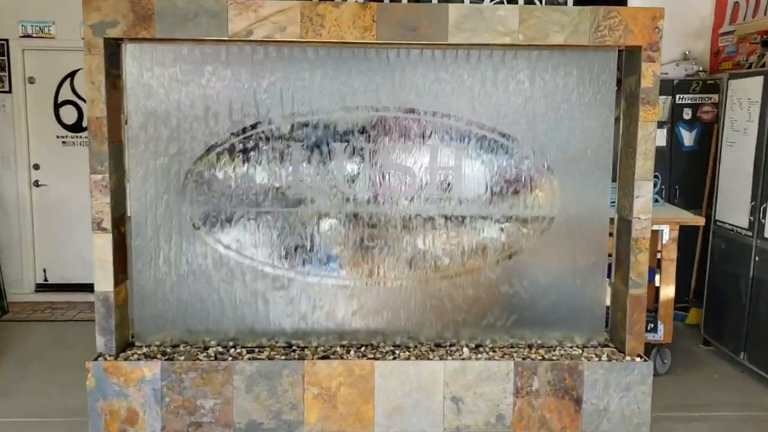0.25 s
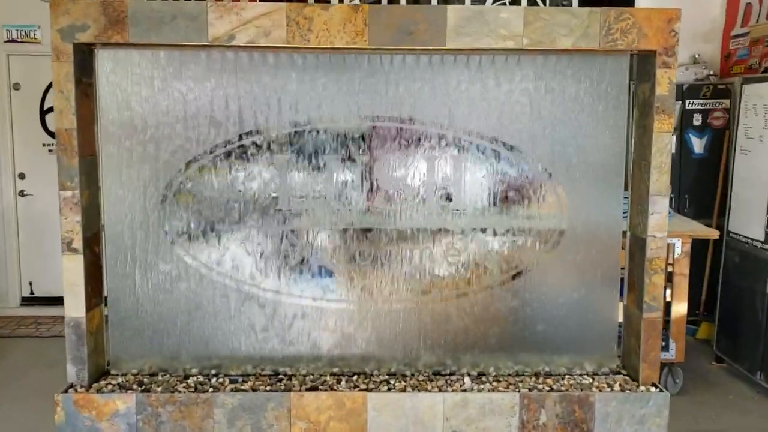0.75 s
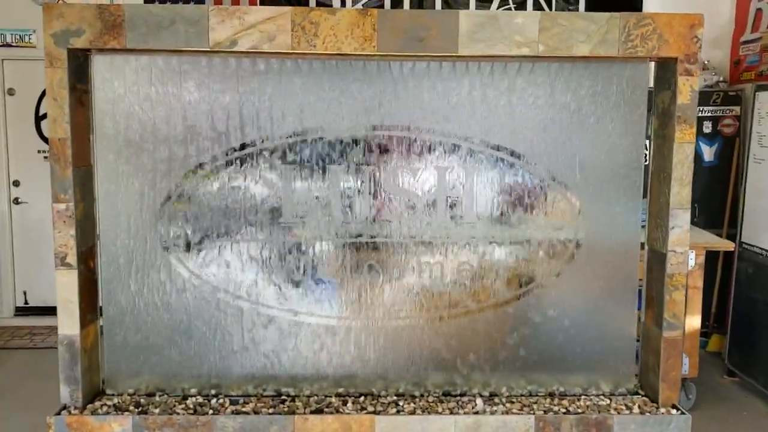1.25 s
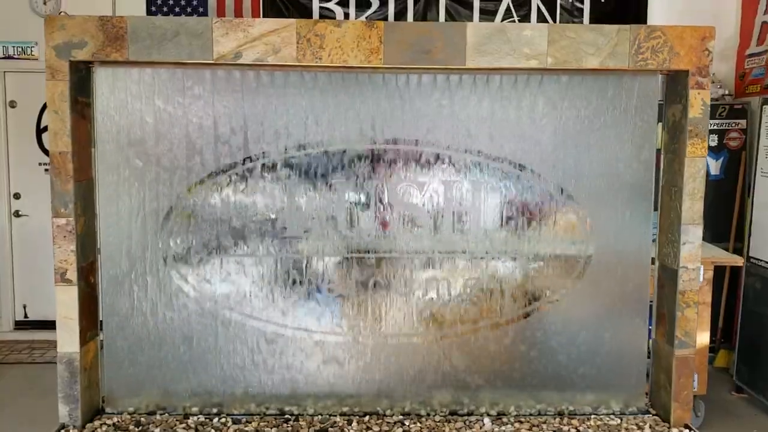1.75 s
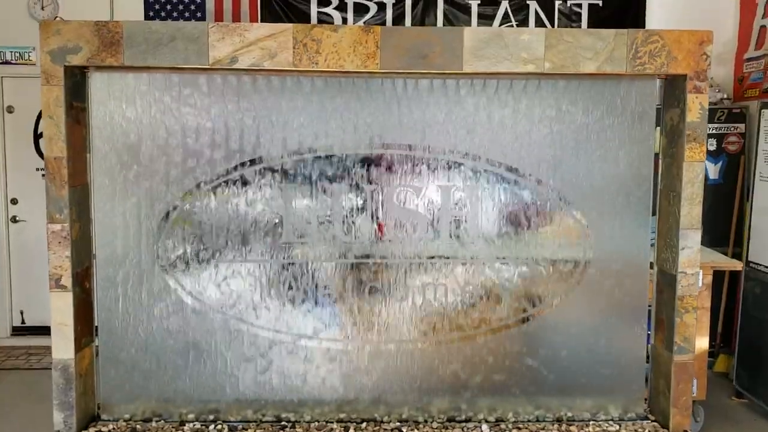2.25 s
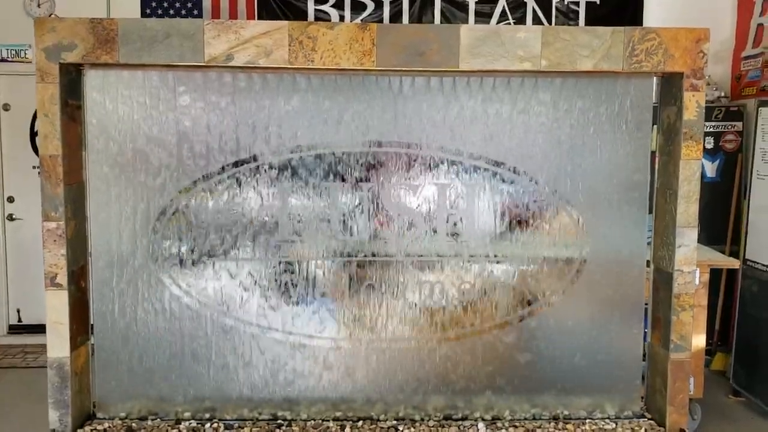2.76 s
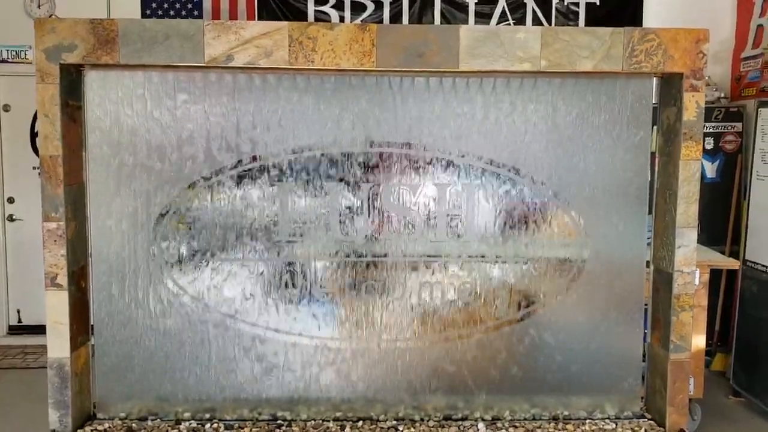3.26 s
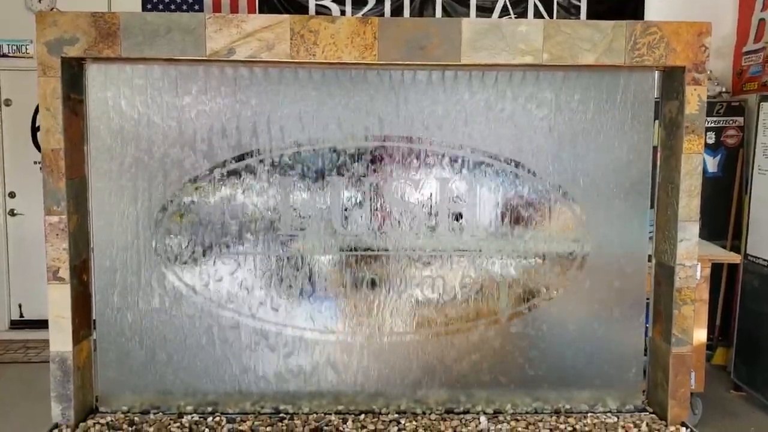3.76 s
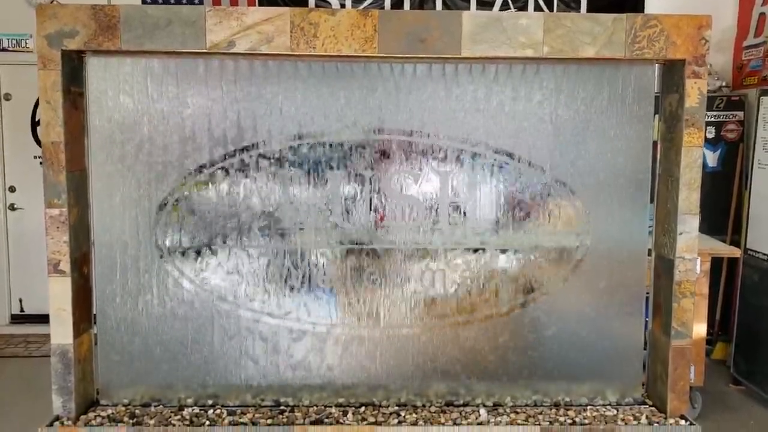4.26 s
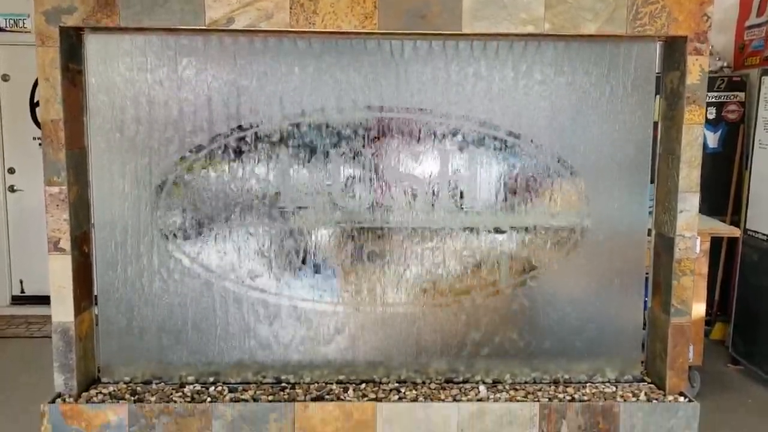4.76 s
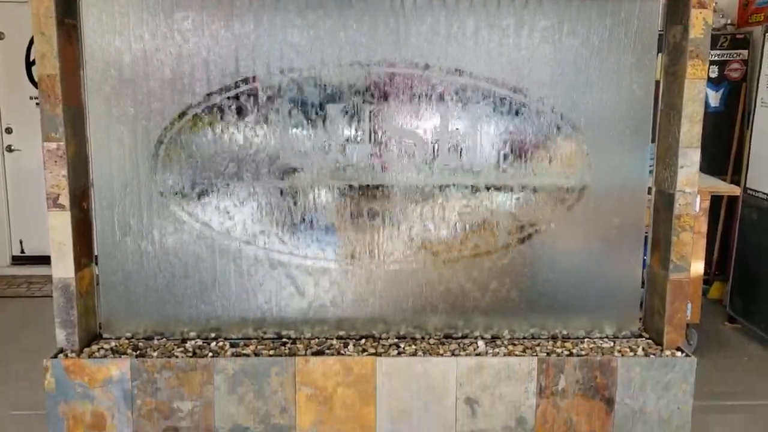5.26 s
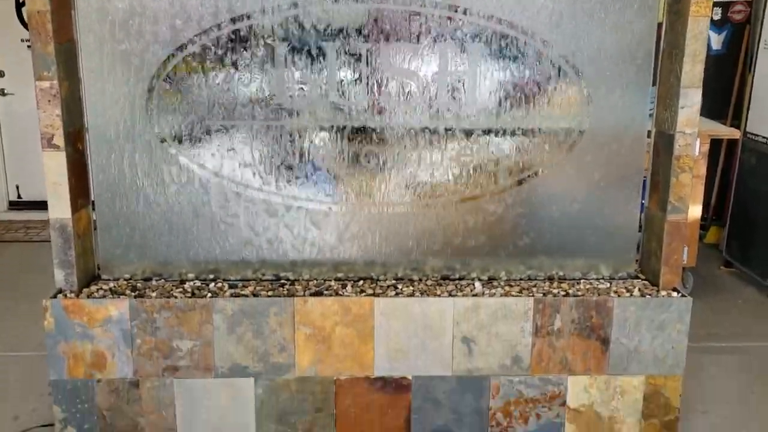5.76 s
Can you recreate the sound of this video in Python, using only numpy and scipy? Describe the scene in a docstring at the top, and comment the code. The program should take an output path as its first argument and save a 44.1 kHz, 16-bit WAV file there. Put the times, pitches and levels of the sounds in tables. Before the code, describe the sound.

For about six seconds, water slides down a panel and drops onto pebbles in a basin. A fine, bright, flickering hiss and a softer, patchy trickle run throughout, over a quiet low pump hum near 108 Hz and room rumble. From 0.15 to 0.45 seconds bubbly splashes and clicks crowd together, with one very brief tap on the recorder at 0.2, stronger on the right. More splashing comes around 0.7 and 0.9. Dull, soft footfalls land at about 1.0, 1.3, 1.4 and 1.7. Then scattered round plops, drips and tiny hard stone clicks continue irregularly, with a clearer splash near 3.2 and quieter bubbling around 4.5. At 5.4 to 5.5 sharp clicks and splashes flare up, then ease. The hard workshop gives each splash a short ring; bass is central, treble wide and uneven between sides.

```python
"""A water wall in a workshop: a film of water slides down a glass panel and drops onto pebbles in a basin.
All through, pump and mains hum under a trickle and a fine spray, both shaped noise, with small chance drips.
Splashes (clumps of ringing bubbles) crowd the start; at 0.2 s a tap on the hand-held recorder makes one pulse.
Dull footfalls, low roughened tones, come from 1.0 to 1.7 s; splashes and stone clicks liven up near 5.4 s.
The hard room rings after every splash, as fading noise, and two unlike microphone ports take in the sound."""
import sys
import numpy as np
from scipy import signal
from scipy.fft import rfft, irfft, next_fast_len
from scipy.io import wavfile
from scipy.ndimage import uniform_filter1d, map_coordinates

SR = 44100
rng = np.random.default_rng(int(sys.argv[2]) if len(sys.argv) > 2 else 0)


def to_wav(sig):
    """Store sig (one row per channel, or 1-D mono) as 16-bit WAV at the path in sys.argv[1].

    Samples outside -1..1 are clipped; the rate is SR.
    """
    pcm = np.clip(np.atleast_2d(sig), -1, 1) * 32767
    pcm = np.round(pcm).astype(np.int16)
    wavfile.write(sys.argv[1], SR, pcm.T)  # frames by channels


N = 266011  # length in samples, about 6 s
TOP_HZ = 15870  # nothing sounds above this


def amp(db):
    """Turns decibels into a plain multiplier."""
    return 10 ** (np.asarray(db) / 20)


def unit(x):
    """Scales a sound to an rms (average strength) of 1."""
    return x / np.sqrt(np.mean(x ** 2) + 1e-20)


def along(points, hz):
    """Reads a curve of (f/Hz, value) points, with frequency on a log axis."""
    f, v = np.transpose(points)
    return np.interp(np.log(hz + 1), np.log(f + 1), v)


def over_time(points):
    """Reads a curve of (t/s, value) points at every sample."""
    return np.interp(np.arange(N) / SR, *np.transpose(points))


def wobble(rate):
    """A smooth random curve through this many random points a second."""
    knots = rng.standard_normal(int(N * rate / SR) + 4)
    return map_coordinates(knots, [np.arange(N) * rate / SR])


def filtered(x, response):
    """Makes each frequency of x louder or softer, as the response says."""
    m = next_fast_len(N + SR // 2)
    return irfft(rfft(x, m) * response(np.fft.rfftfreq(m, 1 / SR)), m)[..., :N]


def patchy(spectrum, patchy_db, flicker_db):
    """Two unrelated noises, rms 1 together, sharing louder and softer patches and a fast flicker."""
    z = signal.stft(rng.standard_normal((2, N)), nperseg=512)[2]
    field = uniform_filter1d(rng.standard_normal(z.shape[1:]), size=8, axis=0)  # smooth over frequency
    field = uniform_filter1d(field, size=10, axis=1)  # smooth over time
    pair = signal.istft(z * amp(patchy_db * unit(field)), nperseg=512)[1][:, :N]
    flickering = pair * amp(flicker_db * wobble(300))
    return unit(filtered(flickering, lambda hz: amp(along(spectrum, hz))))


# Steady tones of pump and mains: f/Hz, level/dB (rms), waver/dB
PUMP_TONES = [(59.5, -73, 2), (108.2, -50, 0.6), (116.1, -66, 2), (120, -69, 3), (216.5, -67.5, 1),
              (349, -75, 1.5)]
# Colour of the room's rumble: f/Hz, relative level/dB per Hz
RUMBLE_COLOUR = [(12, -21), (25, 0.5), (45, -9), (75, 2.5), (140, -0.5), (190, 2), (300, -3.5), (370, -6),
                 (470, -18), (700, -15), (1000, -74)]


def pump():
    """Pump and mains give steady, slightly wavering tones over the rumble of the room."""
    t = np.arange(N) / SR
    tones = np.zeros(N)
    for hz, db, waver_db in PUMP_TONES:
        level = amp(db + waver_db * wobble(4))
        tones += level * np.sin(2 * np.pi * (hz * t + rng.random()))
    rumble = amp(-63) * patchy(RUMBLE_COLOUR, patchy_db=1, flicker_db=1.0)
    return np.sqrt(2) * tones * [[1], [0]] + rumble  # the tones take the first path only


# Loudness of the spray before its swell: t/s, level/dB
SPRAY_LOUDNESS = [(0.0, -56), (0.23, -57.5), (0.45, -60), (0.6, -55.5), (0.78, -50), (0.98, -56.5),
                  (1.08, -52.5), (1.26, -50), (1.38, -53.5), (1.75, -55), (1.88, -54), (2.1, -53.5),
                  (2.42, -56), (2.7, -52), (2.88, -50.5), (3.01, -57.5), (3.12, -50.5), (3.35, -52),
                  (3.6, -57), (3.8, -53.5), (4.02, -56), (4.22, -53.5), (4.4, -55), (4.6, -51.5),
                  (4.8, -54.5), (5.04, -56.5), (5.2, -53), (5.42, -50.5), (5.52, -53.5), (5.6, -56),
                  (5.69, -52.5), (6.03, -54)]
# Colour of the spray: f/Hz, relative level/dB per Hz
SPRAY_COLOUR = [(1760, -53), (3000, -62), (3260, -66), (3830, -10), (4980, -3.5), (7100, 8.5), (7940, 3),
                (12500, 4.5), (13500, 5), (14600, 12.5), (15700, 5.5)]


def spray(swell):
    """Fine spray is a bright hiss: countless tiny drops blur into flickering noise."""
    level = amp(over_time(SPRAY_LOUDNESS) + 2.52 * swell)  # swell in dB
    return level * patchy(SPRAY_COLOUR, patchy_db=1.2, flicker_db=0.9)


# Loudness of the trickle before its swell: t/s, level/dB
TRICKLE_LOUDNESS = [(0.0, -58), (0.2, -57.5), (0.34, -49), (0.5, -59), (0.86, -63), (1.0, -62), (1.15, -61),
                    (1.3, -53.5), (1.47, -64), (1.71, -58), (1.88, -65), (2.48, -66.5), (2.82, -56),
                    (3.0, -60.5), (3.31, -61), (3.47, -60), (3.55, -62.5), (3.65, -66.5), (3.82, -64),
                    (3.97, -67), (4.2, -64), (4.42, -66), (4.62, -66.5), (4.85, -65), (5.12, -59),
                    (5.24, -65), (5.36, -60), (5.5, -60.5), (5.61, -58.5), (6.03, -65)]
# Colour of the trickle: f/Hz, relative level/dB per Hz
TRICKLE_COLOUR = [(260, -26), (450, -4), (963, -4), (1460, 3), (2040, -6), (2860, -3), (3270, -8),
                  (3820, 0.5), (4500, -2.5), (5850, -4.5), (9900, -120)]


def trickle(swell):
    """Water trickling between the pebbles is a patchy noise, lower than the spray."""
    level = amp(over_time(TRICKLE_LOUDNESS) + 2 * swell)  # swell in dB
    return level * patchy(TRICKLE_COLOUR, patchy_db=3, flicker_db=0.0)


def water_film():
    """The steady water: trickle and spray swell together."""
    swell = wobble(8)
    return trickle(swell) + spray(swell)


def knock():
    """A finger taps the housing by the right port: a dip and a rebound, stronger on the right."""
    u = (np.arange(N) / SR - 0.203) / 0.00063  # time from the middle of the tap, in steps of 0.63 ms
    return amp([[-44], [-24]]) * u * np.exp(-abs(u) ** 0.96)


# Dull footfalls on the floor: t/s, level/dB, f/Hz
FOOTFALLS = [(1.032, -49, 336), (1.301, -53, 366), (1.38, -52.5, 382), (1.7, -57, 340)]
FOOTFALL_T60_S, FOOTFALL_RISE_S = 0.3, 0.012  # time to fall by 60 dB; time scale of the soft start
FOOTFALL_ROUGH = 0.8  # depth of the random roughness


def footfalls():
    """Low, roughened, soft-starting thuds, sent down the first path, which both ports share."""
    out, t = np.zeros((2, N + SR)), np.arange(SR // 2) / SR
    for s, db, hz in FOOTFALLS:
        rough = uniform_filter1d(rng.standard_normal(len(t)), size=400)
        ring = np.sin(2 * np.pi * hz * t) * (1 + FOOTFALL_ROUGH * unit(rough))
        envelope = amp(db - 60 * t / FOOTFALL_T60_S) * (1 - np.exp(-t / FOOTFALL_RISE_S))
        out[0, round(s * SR):][:len(t)] += envelope * ring
    return out[:, :N]


# Drops striking pebbles: t/s, click level/dB, f/Hz, level/dB of the droplets thrown up
PEBBLE_DROPS = [(0.2019, -42, 14600, -52), (0.3016, -56, 6900, -56.5), (0.416, -38, 5550, -51.5),
                (0.8675, -52, 7500, -63), (0.899, -41.5, 7000, -67), (1.045, -65, 8500, -57),
                (1.62, -54, 14200, -61.5), (1.8, -56, 15400, -60), (1.958, -53, 15500, -62),
                (2.142, -56, 14400, -66), (2.2159, -43, 8700, -60.5), (2.5893, -43, 11000, -59),
                (2.651, -44, 15200, -62), (2.811, -64, 10400, -61.5), (2.837, -40, 13600, -59.5),
                (2.9156, -43, 14600, -55), (3.041, -63, 8700, -60), (3.521, -52, 13500, -58),
                (3.692, -43, 14900, -66), (3.8367, -47, 8700, -55.5), (3.971, -41, 14400, -57.5),
                (4.3165, -42, 14400, -62), (4.3306, -54, 14800, -79), (4.349, -41, 14900, -77),
                (4.563, -53, 13900, -63), (4.744, -42, 7400, -62.5), (5.123, -48, 8500, -60),
                (5.4256, -38, 5700, -67), (5.4357, -32.5, 7170, -77), (5.474, -37, 14300, -62),
                (5.6166, -42, 14200, -62), (5.712, -46, 10200, -62)]
TICK_T60_S, TICK_RISE_S = 0.014, 0.0002  # time to fall by 60 dB; time scale of the start
TICK_NOISY = 0.55  # strength of the noisy crack, which mostly colours the highest clicks
BOUNCE_S, BOUNCE_DB = 0.0125, -9  # delay and level of the echo off the floor


def ticks():
    """A drop on stone gives a very short ringing click, then an echo off the floor by the second path."""
    out, t = np.zeros((2, N + SR)), np.arange(SR // 100) / SR
    for s, db, hz, _ in PEBBLE_DROPS:
        crack = np.diff(rng.standard_normal(len(t) + 2), 2)
        ring = np.sin(2 * np.pi * min(hz, TOP_HZ) * t) + TICK_NOISY * (hz / TOP_HZ) ** 3 * crack
        envelope = amp(db - 60 * t / TICK_T60_S) * (1 - np.exp(-t / TICK_RISE_S))
        out[0, round(s * SR):][:len(t)] += envelope * ring
    delay = round(BOUNCE_S * SR)
    out[1, delay:] = amp(BOUNCE_DB) * out[0, :-delay]
    return out[:, :N]


def spatter():
    """Rows like the splashes: droplets thrown up by each click, spread by half an octave."""
    return [(s, db, hz, 0.5, 0.012) for s, _, hz, db in PEBBLE_DROPS]


def drips(count):
    """Rows like the splashes: small drips of scattered pitch at chance moments."""
    when = rng.random(count) * N / SR
    level_db = -76 + 1.5 * rng.standard_normal(count)
    pitch_hz = 2600 * 2 ** (0.7 * rng.standard_normal(count))  # scattered by 0.7 octaves
    return [(s, db, hz, 0.06, 0.012) for s, db, hz in zip(when, level_db, pitch_hz)]


# How long the room rings at each pitch: f/Hz, time to fall by 60 dB/s
ROOM_RING = [(300, 0.79), (2000, 0.28), (6000, 0.19), (15000, 0.2)]


def echoed(burst, hz, near_db):
    """Hard walls scatter a burst into fading noise, different along two paths, after the straight sound."""
    t = np.arange(SR * 2 // 5) / SR
    fade = amp(-60 * t / along(ROOM_RING, hz)) * (1 - np.exp(-t / 0.006))  # the scatter builds up in some 6 ms
    tail = rng.standard_normal((2, len(t))) * fade
    tail /= np.linalg.norm(tail, axis=1, keepdims=True)
    tail[0, 0] = amp(near_db)  # the straight sound
    even_burst = burst[None] / np.linalg.norm(burst)
    return signal.fftconvolve(even_burst, tail, axes=1) * np.sqrt(0.075 * SR)  # energy like rms 1 for 75 ms


# Splashes at set times, loud and faint: t/s, level/dB, bubble f/Hz, pitch spread/octaves,
# half the time over which bubbles start/s
TIMED_SPLASHES = [(0.155, -51.5, 2450, 0.46, 0.048), (0.198, -57, 1050, 0.45, 0.014),
                  (0.2143, -49.5, 2840, 0.29, 0.0044), (0.2156, -56, 6700, 0.22, 0.014),
                  (0.242, -65, 5500, 0.47, 0.0049), (0.222, -52, 2950, 0.36, 0.0032),
                  (0.23, -50.5, 2640, 0.33, 0.0029), (0.237, -60, 2720, 0.46, 0.0028),
                  (0.2417, -53.5, 2400, 0.34, 0.0015), (0.248, -65, 2930, 0.22, 0.004),
                  (0.2978, -54, 1560, 0.45, 0.0021), (0.303, -46.5, 5130, 0.5, 0.05),
                  (0.308, -48, 13000, 0.54, 0.045), (0.386, -65, 1060, 0.1, 0.00463),
                  (0.413, -59.5, 1550, 0.13, 0.008), (0.64, -53.5, 3400, 0.36, 0.036),
                  (0.704, -58.5, 1457, 0.11, 0.022), (0.704, -54.5, 4000, 0.48, 0.008),
                  (0.722, -71, 2010, 0.26, 0.002), (0.7258, -55, 4260, 0.33, 0.0025),
                  (0.73, -61, 1466, 0.12, 0.031), (1.06, -63.5, 690, 0.19, 0.01),
                  (0.883, -65, 906, 0.16, 0.026), (0.889, -60.5, 2430, 0.67, 0.022),
                  (1.018, -55, 790, 0.68, 0.026), (1.037, -55.5, 2460, 0.31, 0.03),
                  (1.216, -65.5, 1530, 0.25, 0.021), (1.287, -60.5, 1556, 0.28, 0.019),
                  (1.346, -63.5, 2410, 0.052, 0.022), (1.359, -60.5, 1750, 0.093, 0.018),
                  (1.362, -59.5, 1320, 0.13, 0.028), (1.507, -62.5, 1910, 0.16, 0.015),
                  (1.626, -63.5, 1375, 0.065, 0.014), (1.631, -56.5, 2450, 0.83, 0.03),
                  (1.665, -68, 820, 0.18, 0.0043), (1.798, -67, 1304, 0.079, 0.01),
                  (1.8, -58.5, 3500, 0.19, 0.03), (1.828, -67, 1006, 0.15, 0.032),
                  (2.066, -64, 5240, 0.19, 0.0054), (2.114, -66, 1110, 0.34, 0.035),
                  (2.148, -63, 3300, 0.46, 0.016), (2.369, -64.5, 2000, 0.31, 0.014),
                  (2.402, -66, 1230, 0.23, 0.018), (2.455, -72, 3900, 0.023, 0.0037),
                  (2.572, -64.5, 1190, 0.36, 0.017), (2.609, -67, 780, 0.23, 0.0091),
                  (2.622, -66, 1340, 0.041, 0.0048), (2.654, -64, 3920, 0.061, 0.0086),
                  (2.719, -63, 2800, 0.076, 0.01), (2.734, -66, 893, 0.053, 0.0044),
                  (2.739, -62, 1375, 0.07, 0.017), (2.755, -64.5, 1720, 0.037, 0.035),
                  (2.816, -64.5, 4200, 0.084, 0.0047), (2.919, -63, 920, 0.49, 0.029),
                  (2.92, -60, 2270, 0.058, 0.0032), (2.933, -70, 2210, 0.034, 0.04),
                  (3.044, -63, 2300, 0.27, 0.0085), (3.046, -63, 1390, 0.1, 0.026),
                  (3.229, -69, 3940, 0.087, 0.0027), (3.163, -62, 3640, 0.2, 0.029),
                  (3.179, -67.5, 1070, 0.41, 0.0078), (3.228, -55, 1810, 0.23, 0.02),
                  (3.435, -72.5, 2720, 0.045, 0.039), (3.458, -70, 1430, 0.052, 0.0042),
                  (3.553, -66, 1696, 0.052, 0.0035), (3.705, -66.5, 5970, 0.079, 0.008),
                  (3.71, -63.5, 1786, 0.025, 0.018), (3.768, -62.5, 1510, 0.059, 0.027),
                  (3.839, -65.5, 1757, 0.063, 0.01), (4.044, -65, 1512, 0.056, 0.013),
                  (4.099, -70, 1240, 0.059, 0.011), (4.213, -70, 3600, 0.025, 0.04),
                  (4.267, -62.5, 2330, 0.03, 0.0035), (4.268, -59, 1290, 0.26, 0.018),
                  (4.479, -78, 1440, 0.056, 0.0097), (4.529, -77, 1490, 0.052, 0.0092),
                  (4.644, -74.5, 1540, 0.089, 0.019), (4.55, -75, 776, 0.11, 0.0072),
                  (4.567, -68, 3750, 0.053, 0.0034), (4.747, -74, 2100, 0.05, 0.01),
                  (4.772, -63.5, 2370, 0.07, 0.02), (4.773, -61.5, 3820, 0.066, 0.006),
                  (4.776, -59, 6000, 0.34, 0.012), (4.746, -70.5, 4700, 0.08, 0.002),
                  (4.652, -68.5, 5080, 0.057, 0.02), (4.645, -76.5, 2070, 0.055, 0.015),
                  (4.808, -67, 2870, 0.05, 0.035), (4.905, -68, 1030, 0.076, 0.025),
                  (4.974, -68, 2410, 0.16, 0.017), (5.124, -69, 2050, 0.38, 0.019),
                  (5.219, -75.5, 867, 0.062, 0.0053), (5.256, -70, 4000, 0.17, 0.016),
                  (5.293, -64, 1550, 0.05, 0.0034), (5.307, -65.5, 1650, 0.056, 0.006),
                  (5.323, -63, 1600, 0.067, 0.01), (5.4, -56, 4070, 0.33, 0.051),
                  (5.4377, -54, 1432, 0.026, 0.003), (5.44, -61, 6300, 0.13, 0.03),
                  (5.445, -60.5, 2030, 0.17, 0.014), (5.473, -66, 1510, 0.081, 0.0016),
                  (5.475, -58.5, 3370, 0.23, 0.0042), (5.621, -62.5, 2456, 0.04, 0.012),
                  (5.561, -74, 7000, 0.072, 0.001), (5.628, -67.5, 1250, 0.12, 0.02),
                  (5.71, -64.5, 1470, 0.061, 0.0031), (5.808, -70.5, 1380, 0.052, 0.014)]
IMPACT_DB, BUBBLE_SCATTER_DB = 22, 2  # most lift of the first bubble; random spread of the others
SUDDEN_S, CLEAR_SPREAD = 0.02, 0.3  # much longer (s) or wider (octaves) splashes have no leading bubble
BUILD_DB = 4.5  # how much fainter a long splash begins
NEAR_DB, WASH_DB = 4, 10  # straight sound over its scatter; its loss in long wide splashes


def bubbles(hz, spread, lasts):
    """Each trapped bubble rings and dies away; a wider spread of pitch means shorter, crackling ones."""
    pitch, size = rng.standard_normal((2, 72, 1))
    start = lasts * 2 * np.sort(rng.random((72, 1)), axis=0) ** 1.5
    size_db = BUBBLE_SCATTER_DB * size
    # the first bubble marks the impact
    pitch[0], size_db[0] = 0, IMPACT_DB * np.exp(-lasts / SUDDEN_S - abs(spread) / CLEAR_SPREAD)
    f = np.clip(hz * 2 ** (spread * pitch), 200, TOP_HZ)
    life = (0.76 / (abs(spread) + 0.0059)) / f
    t = np.arange(int(SR * (2 * lasts + 6 * life.max()))) / SR
    age = np.maximum(t - start + start[0], 0)
    # long splashes swell
    long_share = 1 - np.exp(-(lasts / SUDDEN_S) ** 2)
    size_db = size_db - BUILD_DB * long_share * np.exp(-2 * start / lasts)
    # a bubble swells in about a cycle, and its pitch climbs a little as it rises
    envelope = np.exp(-age / life) * (1 - np.exp(-age * f / 0.42))
    ring = np.sin(2 * np.pi * f * age * (1 + 0.012 * age / life))
    return (amp(size_db) * envelope * ring / np.sqrt(life)).sum(0)


def splashes():
    """Splashes, spatter and drips each trap a clump of bubbles, and the room rings after it."""
    out = np.zeros((2, N + SR))
    for s, db, hz, spread, lasts in TIMED_SPLASHES + spatter() + drips(count=100):
        near_db = NEAR_DB - WASH_DB * abs(spread) * lasts / SUDDEN_S
        sound = echoed(bubbles(hz, spread, lasts), hz, near_db)
        out[:, round(s * SR):][:, :sound.shape[1]] += amp(db) * sound
    return out[:, :N]


# How alike left and right are: f/Hz, likeness (1 = the same, 0 = unrelated)
LIKENESS = [(25, 0.57), (60, 1), (150, 0.89), (380, 0.75), (700, 0.38), (1400, 0.011), (2800, 0.028),
            (5980, 0.0057), (15000, 0.021)]


def scene():
    """Adds the sources; the two paths reach the ports alike in the bass and nearly unrelated in the treble."""
    paths = pump() + water_film() + footfalls() + ticks() + splashes()
    turn = lambda hz: np.arccos(np.clip(along(LIKENESS, hz), -1, 1)) / 2
    mid, side = filtered(paths, lambda hz: np.array([np.cos(turn(hz)), np.sin(turn(hz))]))
    return np.array([mid + side, mid - side]) + knock()


# Left port over right port: f/Hz, level/dB
PORT_BALANCE = [(100, 1.2), (300, 0.9), (1000, 0.2), (2000, 4.5), (4000, 10), (5200, 11), (6500, 14),
                (7100, 11.5), (7900, -1), (10500, -0.5), (12000, 0), (13200, -21), (15500, -10)]


def record(dry):
    """The ports share the sound unequally, by frequency; nothing is kept above the band limit."""
    share = lambda hz: np.sqrt(2 / (1 + amp(np.outer([-2, 2], along(PORT_BALANCE, hz)))))
    return filtered(dry, lambda hz: share(hz) * (hz < TOP_HZ))


dry = scene()
out = record(dry)
to_wav(out)
```